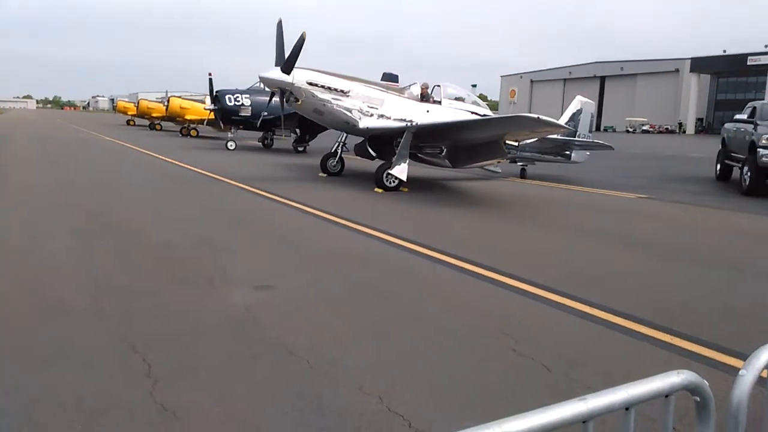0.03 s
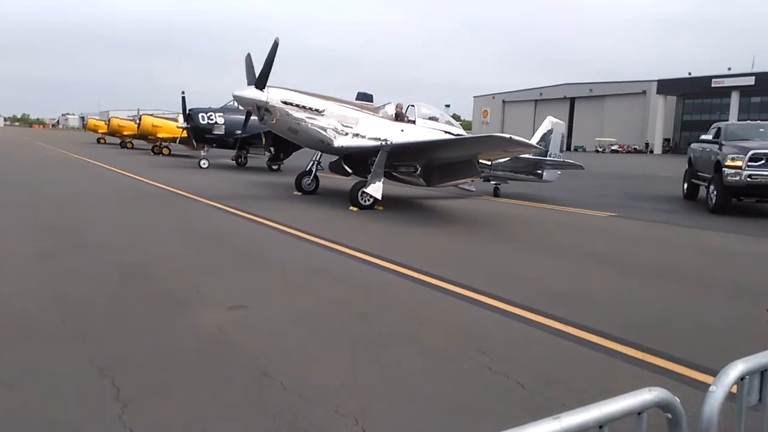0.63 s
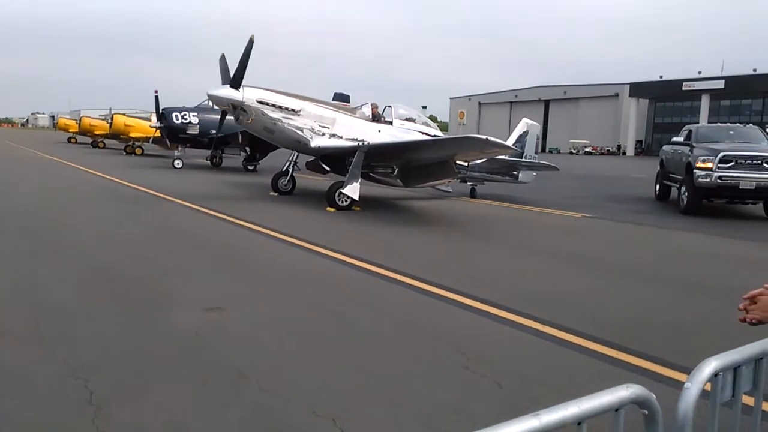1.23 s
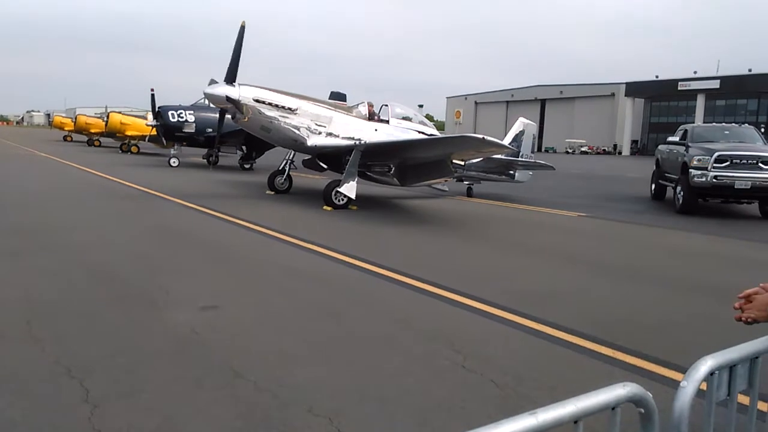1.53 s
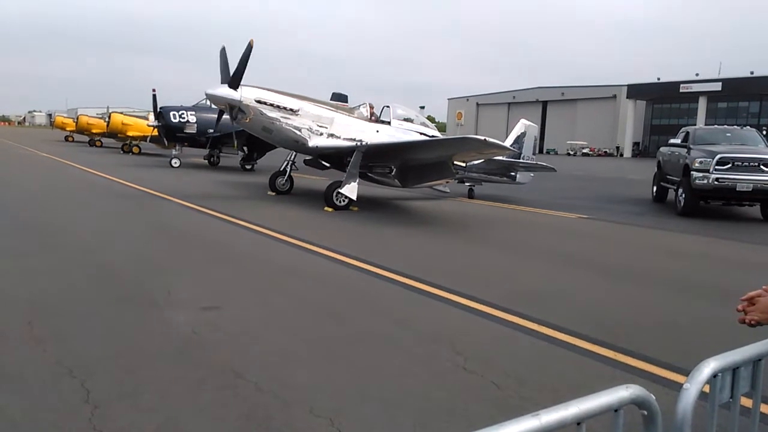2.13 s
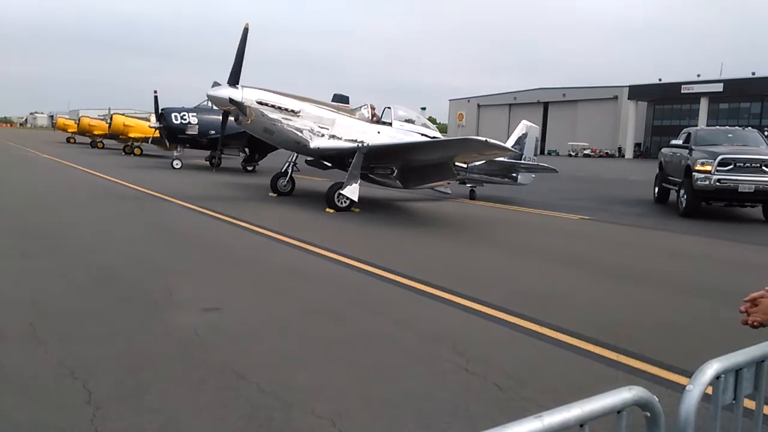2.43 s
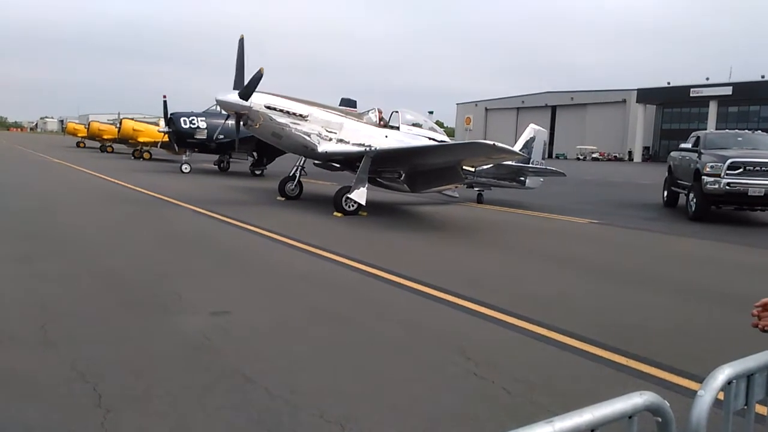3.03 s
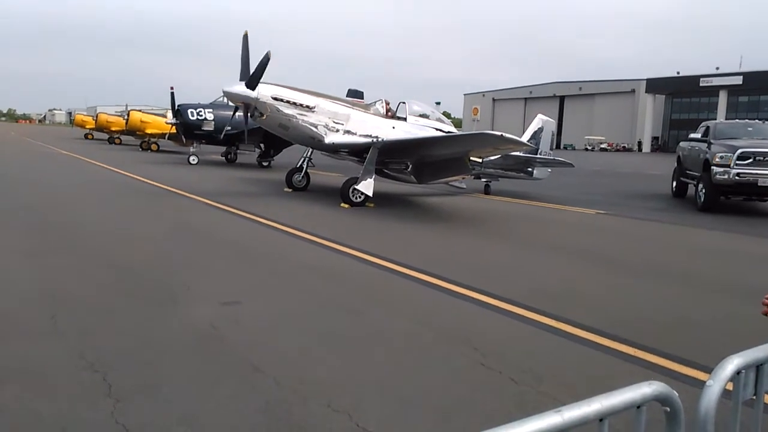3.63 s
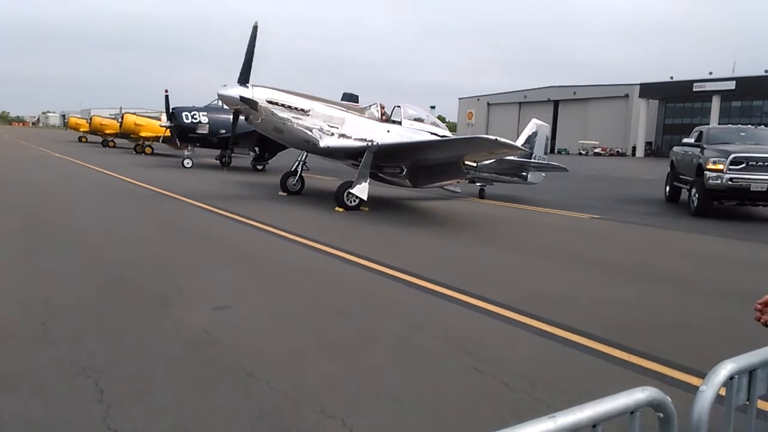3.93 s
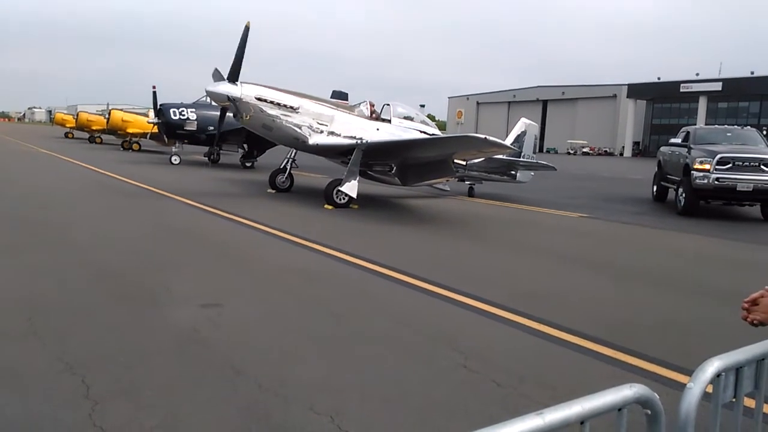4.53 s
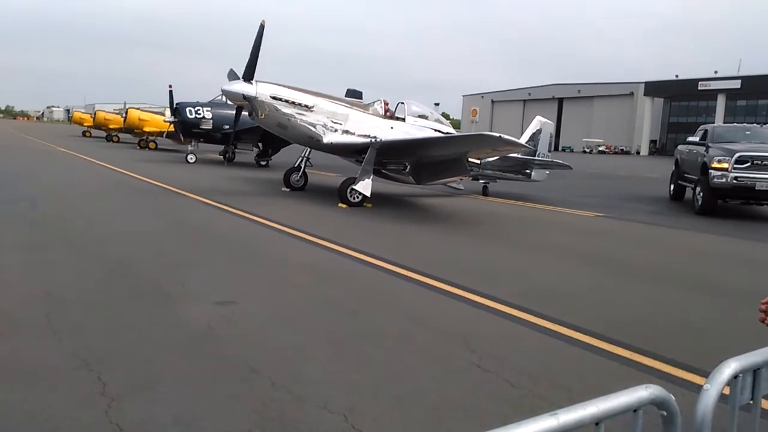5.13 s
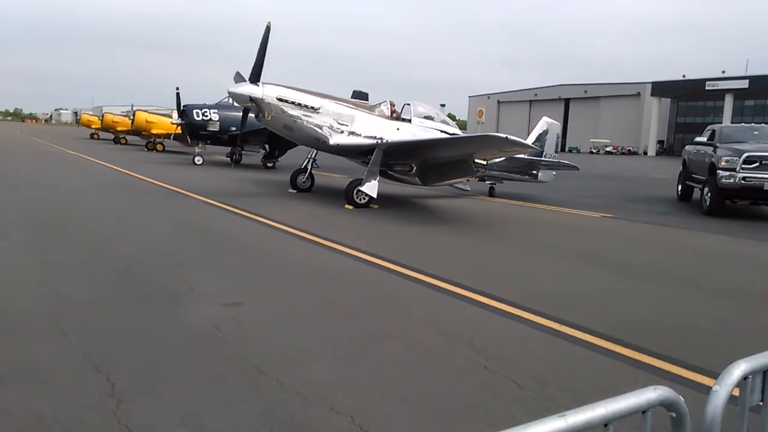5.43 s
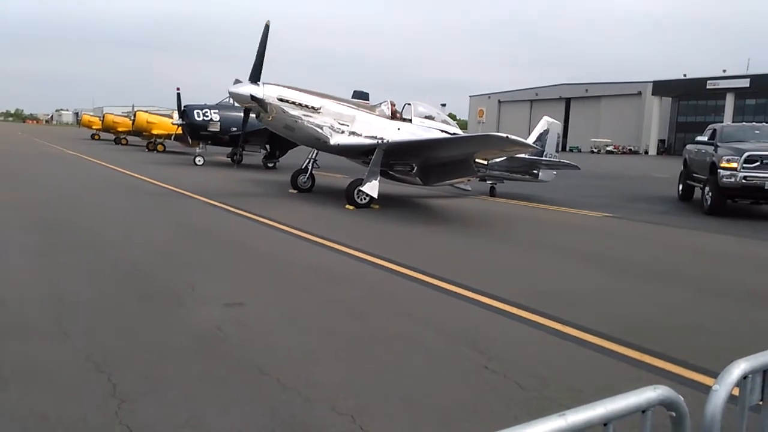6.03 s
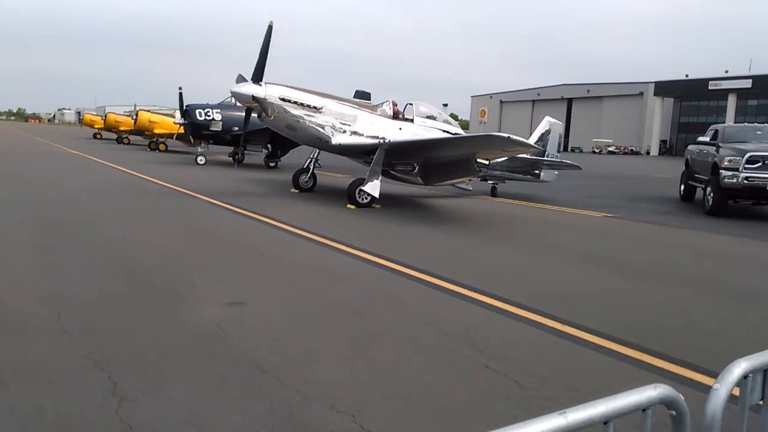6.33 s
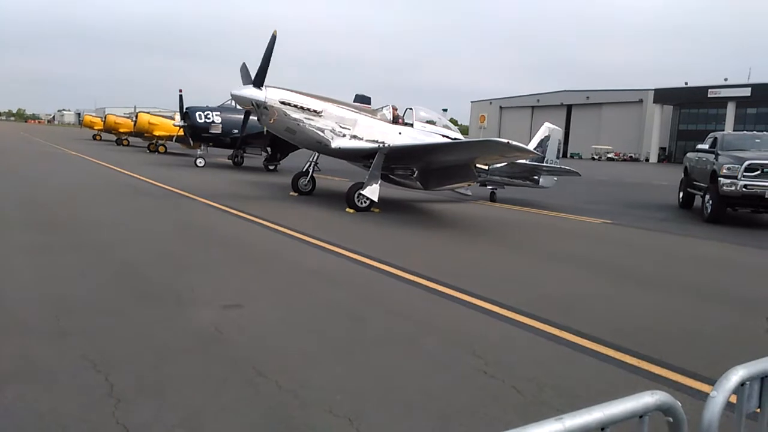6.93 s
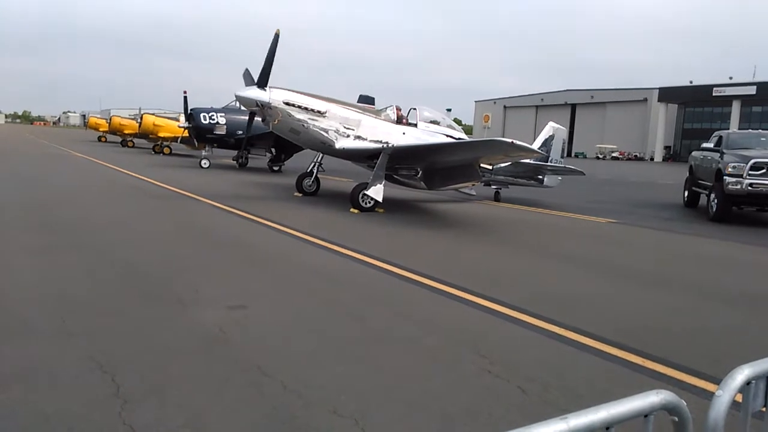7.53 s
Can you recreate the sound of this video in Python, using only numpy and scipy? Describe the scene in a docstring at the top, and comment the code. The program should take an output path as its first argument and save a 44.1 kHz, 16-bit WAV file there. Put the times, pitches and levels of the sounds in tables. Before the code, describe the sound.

An idling piston aircraft engine throbs and barks quickly over rumbling propeller wash, with occasional misfires and burbles.

```python
"""An open apron: a twelve-cylinder piston aircraft engine idles, picks up a little and settles back.
Each firing of the near bank leaves its short exhaust stub as a low thump, a bark and a sharp spit
of gas; the far bank thumps and roars in between. Now and then a cylinder misses, fires hard or
coughs, or unburnt fuel burbles in the exhaust, all over the propeller's wash."""
import sys
import numpy as np
from scipy import signal
from scipy.fft import rfft, irfft
from scipy.io import wavfile
from scipy.ndimage import uniform_filter1d

SR = 44100
rng = np.random.default_rng(int(sys.argv[2]) if len(sys.argv) > 2 else 0)


def unload_wav(signal):
    """Save mono or channel-first audio to the path in sys.argv[1] as 16-bit WAV at rate SR, clipped to [-1, 1]."""
    wavfile.write(
        sys.argv[1],
        SR,
        np.round(np.clip(np.atleast_2d(signal).T, -1, 1) * 32767).astype(np.int16),
    )


N = 343098
TIME = np.arange(N) / SR

# Engine speed. Each row: time in seconds, firings of one bank per second.
FIRING_RATE = [(0.0, 22.43), (0.67, 24.26), (1.32, 27.04), (1.91, 28.01), (2.61, 27.85), (3.22, 26.67),
               (4.27, 25.79), (5.39, 26.35), (6.12, 26.27), (6.77, 25.67), (7.24, 25.88), (7.78, 27.06)]


def gain_of(db):
    """Decibels to amplitude."""
    return 10 ** (np.asarray(db) / 20)


def unit_rms(x):
    """Scales to an rms of one."""
    return x / np.sqrt(np.mean(x ** 2) + 1e-20)


def over_time(points):
    """Breakpoint curve at every sample."""
    return np.interp(TIME, *np.transpose(points))


def over_hz(points, hz):
    """Breakpoint curve on a log-frequency axis."""
    point_hz, value = np.transpose(points)
    return np.interp(np.log(hz + 1), np.log(point_hz + 1), value)


def impulses(times_s, sizes):
    """Train of single impulses."""
    return np.bincount(np.clip(times_s * SR, 0, N).astype(int), sizes, N + 1)[:N]


def resonance(hz, width_hz):
    """Ring that swells and dies within a few cycles."""
    t = np.arange(SR // 8) / SR
    age = np.pi * width_hz * t
    return age * np.exp(1 - age) * np.sin(2 * np.pi * hz * t)


def chance(count, rows):
    """Bounded scatter from firing to firing, one row per quantity."""
    return np.clip(rng.standard_normal((count, rows)), -2.5, 1.5).T


def patches(shape, size):
    """Random time-frequency field with deep notches and modest peaks."""
    field = uniform_filter1d(rng.standard_normal(shape), size=size, axis=0)
    field = uniform_filter1d(field, size=size, axis=1)
    return np.minimum(unit_rms(field), 1.5)


def turbulence(spectrum, patchy_db, frame):
    """Stereo flow noise; its colour shifts in random patches while its power stays even."""
    # Each row: frequency in Hz, left-right coherence from 0 to 1.
    coherence = [(30, .6), (150, .92), (330, .78), (750, .88), (1200, .7), (2200, .52), (3900, .3),
                 (5200, .85), (7000, .6), (9500, .36), (14000, .4)]
    # Each row: frequency in Hz, left minus right in dB.
    balance = [(500, -0.5), (800, 1), (1200, 4.5), (1800, 4.5), (2700, 1), (4100, 3), (6300, -0.5),
               (14000, 0)]
    # Path round the microphone body. Each row: frequency in Hz, left delay in samples.
    left_lag = [(600, 1.5), (1400, 2.2), (2500, 5.5), (3900, 3.6), (4900, 4.1), (6800, 3.3), (9000, 3.3),
                (10000, 2.9)]
    hz = np.fft.rfftfreq(frame, 1 / SR)
    a, b, c, d = rng.standard_normal((4, 4 * N // frame + 5, len(hz)))
    common, separate = a + 1j * b, c + 1j * d
    shared = np.clip(over_hz(coherence, hz), 0, 1)
    delay = np.exp(-2j * np.pi * hz * over_hz(left_lag, hz) / SR)
    bins = np.array([delay * common, shared * common + np.sqrt(1 - shared ** 2) * separate])
    colour = gain_of(over_hz(spectrum, hz) + patchy_db * patches(a.shape, size=9))
    bins *= colour / np.linalg.norm(colour, axis=1, keepdims=True)
    bins *= gain_of(np.outer([.5, -.5], over_hz(balance, hz)))[:, None]
    _, noise = signal.istft(bins.swapaxes(1, 2), nperseg=frame, noverlap=frame - frame // 4)
    return unit_rms(noise[:, :N])


def blowdown(times_s, firing_db, delay_s, open_s, tail_db, tail_s):
    """Gas jet envelope: a short rush as each valve opens, then a fading flow."""
    lead = SR // 40
    t = np.arange(-lead, SR // 8) / SR - delay_s
    rush = np.exp(-.5 * (t / open_s) ** 2)
    opening = .5 + .5 * np.tanh(t / open_s)
    tail = gain_of(tail_db) ** 2 * np.exp(-np.maximum(t, 0) / tail_s) * opening
    power = signal.oaconvolve(impulses(times_s, gain_of(firing_db) ** 2), rush + tail)[lead:lead + N]
    return unit_rms(np.sqrt(abs(power)))


def sputter(depth_db, lump_samples):
    """The jet tears into lumps about a millisecond long."""
    lumps = unit_rms(uniform_filter1d(rng.standard_normal(N), size=lump_samples))
    return unit_rms(gain_of(depth_db * np.clip(lumps, -2, 1)))


def jet_gain(effort_db, idle_db, db_per_db, db_per_hz_s):
    """A jet grows with effort, and more while the engine gathers speed."""
    above_idle_db = effort_db + 22
    pull_hz_s = uniform_filter1d(np.gradient(over_time(FIRING_RATE), TIME), size=SR)
    return gain_of(idle_db + db_per_db * above_idle_db + db_per_hz_s * pull_hz_s)


def firing_cycles(skip_s, lost_cycles):
    """Running count of near-bank firings; the pulse timing skips once by part of a cycle."""
    lost = lost_cycles * np.clip((TIME - skip_s) / .03 + .5, 0, 1)
    return -.27 + np.cumsum(over_time(FIRING_RATE)) / SR - lost


def firing_times(cycles, jitter_s):
    """One firing per whole cycle, slightly uneven."""
    times_s = np.interp(np.arange(int(cycles[-1]) + 1), cycles, TIME)
    return times_s + jitter_s * rng.standard_normal(len(times_s))


def exhaust_pulses(times_s, modes, uneven_db, jitter_s, near_delay_s, far_lead_cycles):
    """Pressure pulses of both banks ring the low exhaust resonances."""
    banks_s = times_s + near_delay_s, times_s - far_lead_cycles * np.gradient(times_s)
    out = np.zeros(N)
    for hz, width_hz, *banks_db in modes:
        for at_s, db in zip(banks_s, banks_db):
            strength, late = chance(len(at_s), rows=2)
            pulses = impulses(at_s + jitter_s * late, gain_of(db + uneven_db * strength))
            out += signal.oaconvolve(pulses, resonance(hz, width_hz))[:N]
    return unit_rms(out)


def exhaust_thump(times_s, effort_db):
    """The deepest resonances; the thump builds as the engine gets going."""
    # Each row: frequency in Hz, width in Hz, near bank in dB, far bank in dB.
    modes = [(91.9, 61.3, 10.5, -19), (69.5, 61, -29.5, 9)]
    # Each row: time in seconds, gain on top of effort in dB.
    swell = [(.3, -2.5), (1.6, 1.5), (2.8, .7), (3.6, -1), (4.8, 0.8), (6.1, -1.5)]
    thump = exhaust_pulses(times_s, modes, uneven_db=1.9, jitter_s=.00067,
                           near_delay_s=.0012, far_lead_cycles=.357)
    return gain_of(effort_db + over_time(swell) + .4) * thump


def exhaust_boom(times_s):
    """The resonances above the thump, struck less evenly."""
    # Each row: frequency in Hz, width in Hz, near bank in dB, far bank in dB.
    modes = [(153, 81, -5.5, -5.5), (218.2, 71, -8, -5.5)]
    return exhaust_pulses(times_s, modes, uneven_db=4, jitter_s=.00045,
                          near_delay_s=.0013, far_lead_cycles=.332)


def drone(cycles, boom_db, idle_db, loaded_db, trough_cycles):
    """Steady part of the pressure wave; its middle orders grow under load."""
    # Each row: order of the firing rate, idle level and loaded level in dB re the boom curve.
    orders = [(2, -23, -25), (3, -17, -15), (4, -8.5, -16), (5, -22, -7.5), (6, -21, -6), (7, -26, -21),
              (8, -12, -6), (9, -12, -48)]
    load = np.clip((boom_db - idle_db) / (loaded_db - idle_db), 0, 1)
    angle = 2 * np.pi * (cycles - trough_cycles)
    return -np.sqrt(2) * sum(gain_of(idle + load * (loaded - idle)) * np.cos(order * angle)
                             for order, idle, loaded in orders)


def propeller_wash():
    """Rumbling air thrown back by the propeller."""
    # Each row: frequency in Hz, relative density in dB.
    spectrum = [(20, -22), (40, -3), (70, -4.5), (130, 4), (220, 0), (300, -7), (420, -18), (700, -10),
                (1000, -20.5), (2300, -17), (3050, -20), (4000, -16.5), (5500, -67), (8000, -11.5),
                (11000, -22), (14000, -47)]
    return turbulence(spectrum, patchy_db=6.5, frame=2048)


def far_roar(times_s, lead_cycles, uneven_db):
    """The far bank's barks come round the fuselage, ragged, between the near firings."""
    # Each row: frequency in Hz, relative density in dB.
    spectrum = [(300, -3), (650, 1.5), (1000, 4.5), (1500, 4), (2300, 5.5), (3050, -1), (4000, 2),
                (5200, -32), (8000, -8), (14000, -19)]
    strength, = chance(len(times_s), rows=1)
    far_s = times_s - lead_cycles * np.gradient(times_s)
    flow = blowdown(far_s, uneven_db * strength, delay_s=0, open_s=.004, tail_db=-1, tail_s=.03)
    return flow * sputter(depth_db=3, lump_samples=60) * turbulence(spectrum, patchy_db=4, frame=512)


def cylinder_levels(times_s):
    """Chuff, bark, ring and spit in dB per firing: each cylinder's habit, plus odd firings."""
    # Near bank in firing order. Each row: bark, ring and spit offsets in dB.
    cylinders = [(-.7, .4, -.3), (.2, -1.2, .9), (.9, .9, -1.5), (.6, .4, .1), (-.3, -.3, -.7),
                 (-.6, -.4, 1.7)]
    # Missed and hard firings. Each row: time in seconds, chuff, bark, ring and spit changes in dB.
    odd_firings = [(.012, -7, -7.5, -10, -11), (.056, 9, 8.5, 2, 2.5), (.446, 14, 6.5, 1, 1.5),
                   (.486, 10, 1, 2, -3), (.528, -8, -13, -9, -9.5), (.78, 8, 1, 0, 3.5),
                   (.858, -14, -5, 7.5, 1.5), (1.168, -1, 4, 0, 0), (1.281, 5, 0, 0.5, 2.5),
                   (1.587, 1, 6, -3, -1.5), (2.162, 7, 1, -1, -4), (2.735, 0, -0.5, -3, 2),
                   (2.807, 0, 2, -1, 2.5), (2.845, -6, 4, 5.5, -0.5), (3.974, -3, 4.5, 6, 0),
                   (4.437, -8, -3, 5, 0.5), (4.553, 4, -15, 3.5, -2), (4.668, 3.5, 4, 2.5, 3),
                   (5.052, -4, -8, 6.5, -1), (5.355, 5, 3.5, -7, -1.5), (5.471, 9.5, -1, 3, 0.5),
                   (6.04, 4, 6, 0, 0), (6.08, 6, 7.5, 1, 0.5), (6.495, -10.5, -15.5, -13, -12),
                   (6.849, -2, 7.5, -22, 0.5), (7.391, 4, -1.5, -20.5, 2), (7.655, 12, -3, 4.5, 4),
                   (7.692, 9, 2, -1, -2.5)]
    bark_db, ring_db, spit_db = np.array(cylinders)[np.arange(len(times_s)) % len(cylinders)].T
    levels_db = np.array([bark_db, bark_db, ring_db, spit_db])  # chuff shares the bark's habit
    for at_s, *changes_db in odd_firings:
        levels_db[:, np.argmin(abs(times_s - at_s))] += changes_db
    return levels_db


def valve_leak(times_s, firing_db):
    """Gas hisses past the valve just before it opens fully."""
    # Each row: frequency in Hz, relative density in dB.
    spectrum = [(1500, -30), (4200, -2), (5400, -16), (7500, 3), (10000, -1), (14300, -10)]
    flow = blowdown(times_s, firing_db, delay_s=-.008, open_s=.0035, tail_db=-9, tail_s=.025)
    return flow * turbulence(spectrum, patchy_db=7, frame=512)


def valve_crack(times_s, firing_db):
    """The stronger the firing, the harder the crack as its valve lifts."""
    # Each row: frequency in Hz, relative density in dB.
    spectrum = [(500, -6), (1500, -14), (3000, -1), (4000, 4), (4650, 3), (5400, 10), (6500, 13),
                (8500, 11.5), (14300, -24)]
    flow = blowdown(times_s, firing_db, delay_s=-.0034, open_s=.0009, tail_db=-8, tail_s=.003)
    return flow * sputter(depth_db=3.5, lump_samples=30) * turbulence(spectrum, patchy_db=6.5, frame=256)


def gas_chuff(times_s, near_db, far_db):
    """Low puff of gas; the far bank's arrives just ahead of the near one."""
    # Each row: frequency in Hz, relative density in dB.
    spectrum = [(250, -22.5), (420, -14.5), (620, 2.5), (790, 2.5), (930, -31), (1300, -16), (3000, -45)]
    near = blowdown(times_s, near_db, delay_s=.0017, open_s=.0034, tail_db=-6, tail_s=.016)
    far = blowdown(times_s, far_db, delay_s=-.0105, open_s=.0025, tail_db=-8, tail_s=.01)
    return np.hypot(near, gain_of(-6.5) * far) * turbulence(spectrum, patchy_db=6, frame=1024)


def gas_bark(times_s, firing_db):
    """Rough midrange burst of the jet."""
    # Each row: frequency in Hz, relative density in dB.
    spectrum = [(600, -11.5), (950, -4), (1200, -9.5), (1480, 7), (1750, -6), (2100, -6.5), (2500, -1.5),
                (3100, -5), (5000, -6.5), (8000, -21)]
    flow = blowdown(times_s, firing_db, delay_s=-.0001, open_s=.002, tail_db=-4, tail_s=.008)
    return flow * sputter(depth_db=2, lump_samples=50) * turbulence(spectrum, patchy_db=5, frame=1024)


def stub_ring(times_s, firing_db, dip_s, dip_width_s, dip_db):
    """Each firing rings its steel stub; the ring fades once and returns."""
    # Each row: frequency in Hz, relative density in dB.
    spectrum = [(2700, -15), (3400, -2.5), (3950, 8), (4350, -2), (5200, -13), (6500, -45)]
    ring_db = firing_db + dip_db * np.exp(-.5 * ((times_s - dip_s) / dip_width_s) ** 2)
    flow = blowdown(times_s, ring_db, delay_s=.0043, open_s=.0025, tail_db=-2, tail_s=.006)
    return flow * turbulence(spectrum, patchy_db=4, frame=1024)


def gas_spit(times_s, firing_db):
    """Sharp treble burst of the jet."""
    # Each row: frequency in Hz, relative density in dB.
    spectrum = [(1500, -56), (2300, -17), (3200, -18), (4000, -19), (4600, -1), (5400, -14.5), (6000, -9),
                (6700, -3.5), (7800, 6), (9000, 8.5), (10500, 4.5), (12500, -1.5), (14300, -7)]
    flow = blowdown(times_s, firing_db, delay_s=-.0006, open_s=.0024, tail_db=-17, tail_s=.011)
    return flow * turbulence(spectrum, patchy_db=3.5, frame=1024)


def airframe_scatter(times_s, firing_db):
    """Wing and fuselage throw the spit back later and duller."""
    # Each row: frequency in Hz, relative density in dB.
    spectrum = [(2500, -13), (3100, -11.5), (4500, -0.5), (5600, 4), (6700, 4), (7800, 6), (9000, 7.5),
                (10800, 3), (12300, -3.5), (14300, -13)]
    flow = blowdown(times_s, firing_db, delay_s=.007, open_s=.004, tail_db=2, tail_s=.007)
    return flow * turbulence(spectrum, patchy_db=7.5, frame=1024)


def stub_jets(times_s, effort_db, chuff_gain):
    """Each firing hisses, cracks, chuffs, barks, rings its stub and spits."""
    # Each row: time in seconds, treble gain in dB.
    treble_level = [(0.0, -16), (1.2, -17), (1.8, -17), (3.8, -17), (4.45, -16.5), (6.2, -18.5),
                    (7.78, -19)]
    spread_db = np.array([1.4, 1, 1.2, .8, 4, 2.5])  # chuff, bark, ring, spit, leak, far chuff
    random_db = spread_db[:, None] * chance(len(times_s), rows=6)
    chuff_db, bark_db, ring_db, spit_db = cylinder_levels(times_s) + random_db[:4]
    leak_offset_db, far_db = random_db[4:]
    leak_gain = jet_gain(effort_db, idle_db=-45, db_per_db=.2, db_per_hz_s=4.2)
    bark_gain = jet_gain(effort_db, idle_db=-31, db_per_db=.53, db_per_hz_s=.8)
    leak = valve_leak(times_s, spit_db + leak_offset_db)
    crack = valve_crack(times_s, 1.2 * spit_db)
    chuff = gas_chuff(times_s, chuff_db, far_db)
    bark = gas_bark(times_s, bark_db)
    ring = stub_ring(times_s, ring_db, dip_s=6.54, dip_width_s=.15, dip_db=-16)
    spit = gas_spit(times_s, spit_db)
    # A harder bark fills the gaps between firings.
    scatter = airframe_scatter(times_s, spit_db) * (bark_gain / bark_gain.mean()) ** .63
    treble = gain_of(-10) * crack + gain_of(-12.5) * ring + gain_of(2) * spit + gain_of(-4.5) * scatter
    treble *= gain_of(over_time(treble_level))
    return chuff_gain * chuff + bark_gain * bark + treble + leak_gain * leak


def hollow_colour(jets):
    """Fixed peaks and dips make the jets hollow; random notches flicker through mids and treble."""
    # Each row: frequency in Hz, gain in dB.
    hollows = [(800, .5), (930, -1.5), (1050, 2), (1200, -.5), (1400, 1), (1550, -.5), (1760, 2.5),
               (2030, -4), (2260, 2), (2420, 1), (2620, -1.5), (2980, -3.5), (3220, .5), (3420, -2),
               (3900, .5), (4500, -1), (5500, 0)]
    # Each row: frequency in Hz, depth of flicker in dB.
    flicker = [(400, -0.5), (1000, 3), (2000, 2.5), (3100, 6.5), (4000, 3), (5500, 10.5), (8000, 2),
               (13000, 0.5)]
    hz, _, bins = signal.stft(jets, SR, nperseg=512, noverlap=384)
    colour = gain_of(over_hz(flicker, hz)[:, None] * patches(bins.shape[1:], size=7))
    colour /= np.sqrt(np.mean(colour ** 2, axis=1, keepdims=True))
    colour *= gain_of(over_hz(hollows, hz))[:, None]
    return signal.istft(bins * colour, nperseg=512, noverlap=384)[1][:, :N]


def coughs(rise_s):
    """Puffs of gas burst from the exhaust and fade, each with its own hollow pitch."""
    # Each row: start in seconds, level in dB, centre in Hz, width in octaves, fade in seconds.
    puffs = [(.053, -19, 624, 0.25, 0.018), (.443, -22, 720, 0.44, .014), (3.705, -26, 650, .12, 0.014),
             (3.853, -25.5, 400, 0.56, 0.047), (4.2, -22, 724, 0.11, 0.011), (6.035, -26, 420, 0.44, 0.017)]
    t, hz = np.arange(SR // 4) / SR, np.fft.rfftfreq(SR // 4, 1 / SR)
    out = np.zeros(N)
    for start_s, db, centre_hz, octaves, fade_s in puffs:
        band = np.exp(-.5 * (np.log2((hz + 1) / centre_hz) / octaves) ** 2)
        noise = irfft(band * rfft(rng.standard_normal(len(t))), len(t))
        envelope = np.minimum(t / rise_s, 1) * np.exp(-t / fade_s)
        puff = unit_rms(envelope * noise) * np.sqrt(np.mean(envelope ** 2))
        out += signal.oaconvolve(impulses(np.array([start_s]), gain_of([db])), puff)[:N]
    return out


def fuel_pops(hz, width_hz):
    """Fuel burning late in the exhaust gives a hollow burble."""
    # Each row: start in seconds, level in dB.
    pops = [(3.794, -14.5), (4.145, -17.5), (6.343, -13.5), (6.422, -13), (6.523, -10.5), (7.009, -13)]
    start_s, db = np.transpose(pops)
    return signal.oaconvolve(impulses(start_s, gain_of(db)), resonance(hz, width_hz))[:N]


def scene():
    """Exhaust of both banks over the propeller wash."""
    # Engine effort as thump strength. Each row: time in seconds, level in dB.
    effort = [(0.1, -18.5), (1.0, -19.5), (2.2, -20.5), (3.95, -19.5), (4.3, -26), (4.7, -24), (6.5, -23.5),
              (7.2, -27), (7.78, -25.5)]
    # Boom curve. Each row: time in seconds, gain in dB.
    boom_level = [(0.2, -19.8), (.95, -24.5), (1.5, -20.6), (2.6, -20.5), (4.7, -28), (7.3, -29.5),
                  (7.78, -30)]
    effort_db, boom_db = over_time(effort), over_time(boom_level)
    boom_gain = gain_of(boom_db)
    chuff_gain = jet_gain(effort_db, idle_db=-35, db_per_db=.41, db_per_hz_s=.34)
    roar_gain = jet_gain(effort_db, idle_db=-38, db_per_db=2.16, db_per_hz_s=1.47)
    cycles = firing_cycles(skip_s=1.42, lost_cycles=.33)
    times_s = firing_times(cycles, jitter_s=.00053)
    thump = exhaust_thump(times_s, effort_db)
    boom = gain_of(-6.5) * exhaust_boom(times_s)
    hum = drone(cycles, boom_db, idle_db=-23, loaded_db=-22.5, trough_cycles=.226)
    low = thump + boom_gain * (boom + hum) + fuel_pops(hz=157.5, width_hz=78)
    wash = gain_of(3.5) * np.sqrt(boom_gain * chuff_gain) * propeller_wash()
    roar = roar_gain * far_roar(times_s, lead_cycles=.25, uneven_db=3.5)
    jets = stub_jets(times_s, effort_db, chuff_gain)
    lull = gain_of(np.interp(TIME, [.035, .05], [-8, 0]))  # the opening firing misses
    return lull * (low + wash) + hollow_colour(lull * roar + jets) + coughs(rise_s=.0018)


def record(dry):
    """Deep bass is shed, the highest peaks clip, then the band is limited."""
    low_cut_hz, high_cut_hz = 41, 14500
    thinned = signal.sosfilt(signal.butter(2, low_cut_hz, "highpass", fs=SR, output="sos"), dry)
    lowpass = signal.firwin(255, high_cut_hz, window=("kaiser", 7), fs=SR)
    return signal.oaconvolve(np.clip(thinned, -.95, .95), lowpass[None], "same")


dry = scene()
out = record(dry)
unload_wav(out)
```